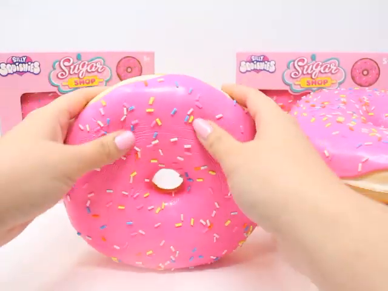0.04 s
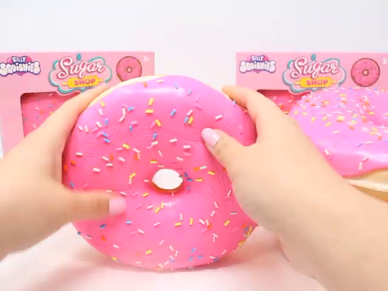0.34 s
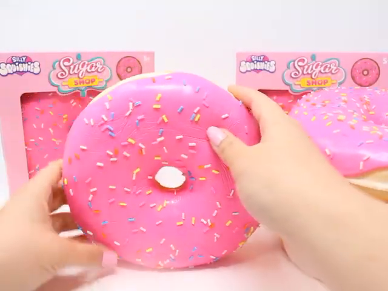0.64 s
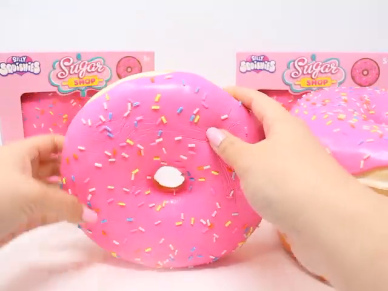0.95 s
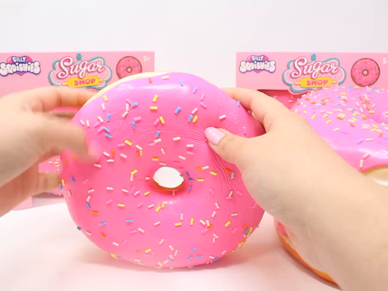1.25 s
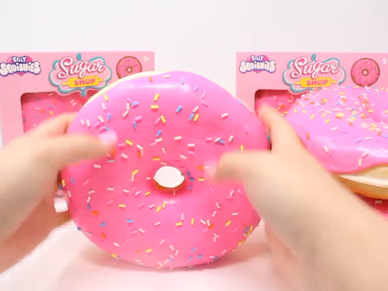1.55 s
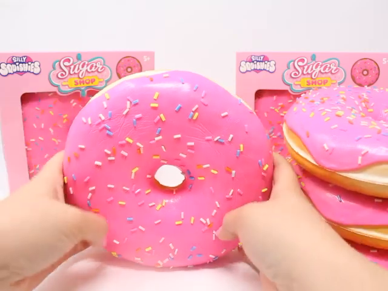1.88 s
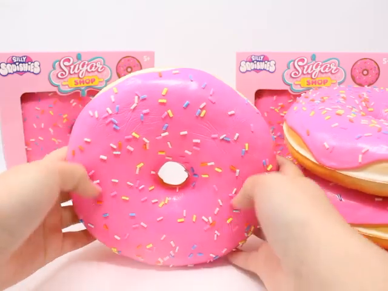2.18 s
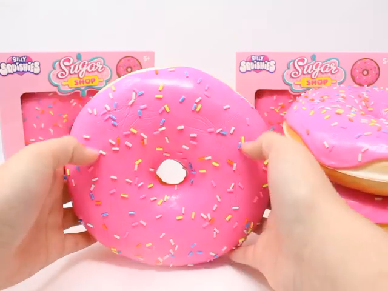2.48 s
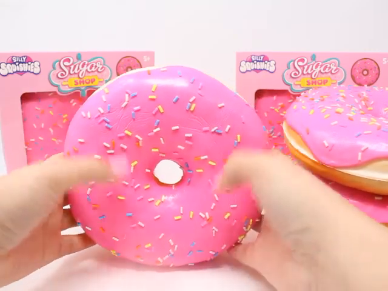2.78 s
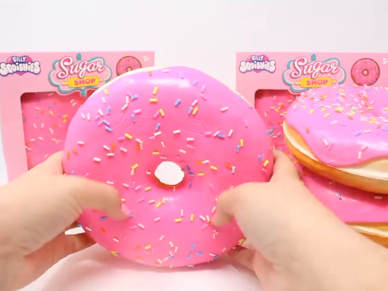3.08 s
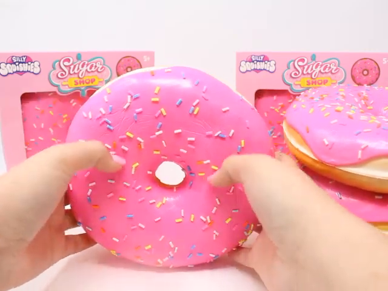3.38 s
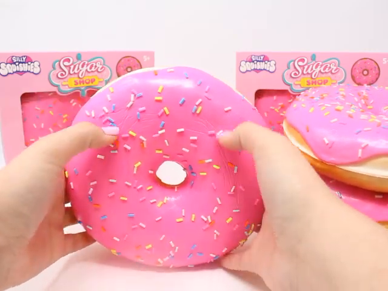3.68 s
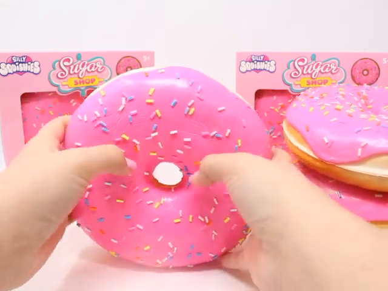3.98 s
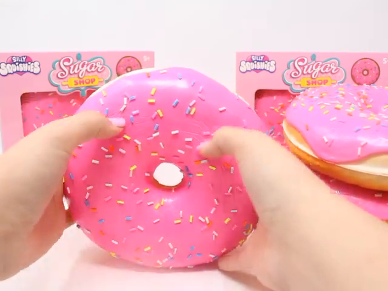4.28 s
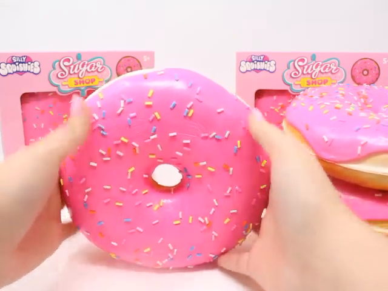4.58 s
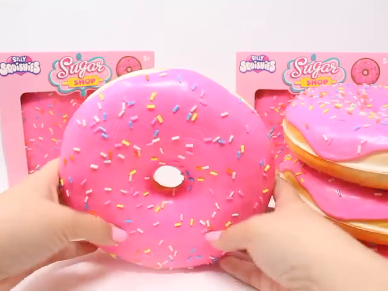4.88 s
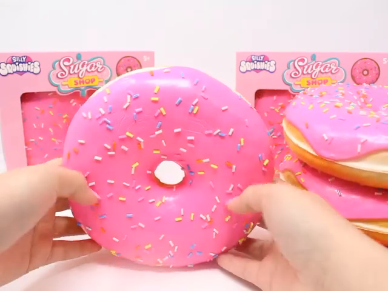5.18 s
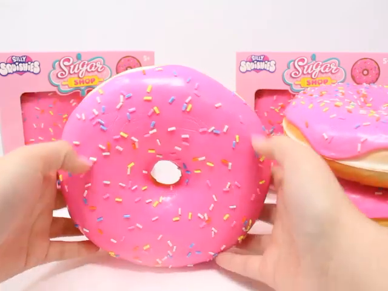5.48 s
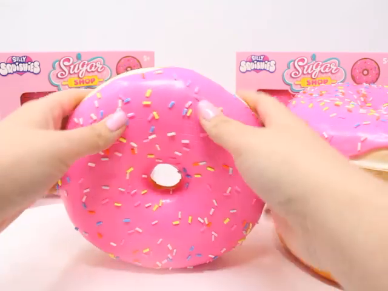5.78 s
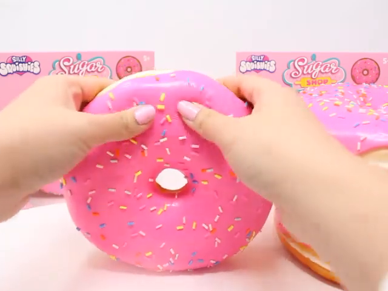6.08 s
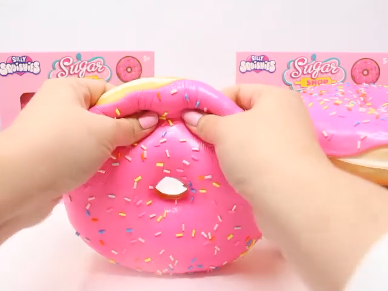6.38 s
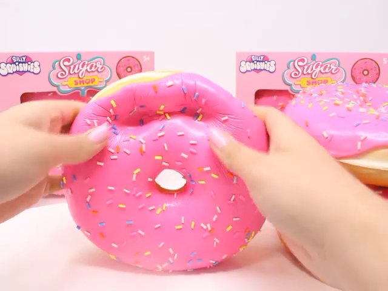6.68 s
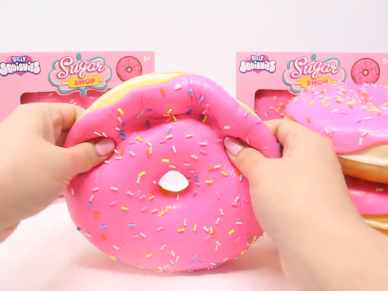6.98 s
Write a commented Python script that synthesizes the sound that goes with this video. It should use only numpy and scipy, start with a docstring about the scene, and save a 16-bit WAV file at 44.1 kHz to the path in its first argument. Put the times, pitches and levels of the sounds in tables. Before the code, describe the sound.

In a small room with a quiet, steady fan hum, a soft foam toy is handled close to the microphone. Gentle rubbing and tiny crackles lead into bunches of sharper sticky pops about once a second as fingers peel away, mixed with occasional fingernail clicks and light taps. The handling ends in softer brushing and crackling. Underneath, a little mechanism ticks faintly and unevenly, and a thin whine briefly comes and goes.

```python
"""Small, sticky pops, very close: fingertips peel off the tacky skin of a big slow-rising foam toy. Two hands
squeeze and turn it on a table. Nails click and knock on the taut skin, palms brush and drag, and now and then
the toy nudges the table with a dull thud. Boxes close behind colour the small room. Underneath, a little
mechanism ticks faintly, a thin whine comes and goes, and a fan hums."""
import sys
import numpy as np
from scipy import signal
from scipy.fft import rfft, irfft
from scipy.io import wavfile
from scipy.ndimage import map_coordinates

SR = 44100
rng = np.random.default_rng(int(sys.argv[2]) if len(sys.argv) > 2 else 0)


def to_wav(sig):
    """Store sig (one row per channel, or 1-D mono) as 16-bit WAV at the path in sys.argv[1].

    Samples outside -1..1 are clipped; the rate is SR.
    """
    pcm = np.clip(np.atleast_2d(sig), -1, 1) * 32767
    pcm = np.round(pcm).astype(np.int16)
    wavfile.write(sys.argv[1], SR, pcm.T)  # frames by channels


N = 310905
TIME = np.arange(N) / SR
SIDE_SIGNS = np.array([[1], [-1]])  # the side signal adds on the left and subtracts on the right

# Table levels are relative; each layer sets its own gain.
# fingertips coming unstuck: start_s, level_db, skin_hz, snap_hz, snap_db, fizz_db, peel_s
PEEL_POPS = [(0.2974, -35.5, 586, 2100, -1, -10, 0.0094), (0.323, -32.5, 580, 2100, -7, -13, 0.0031),
             (0.434, -32.5, 770, 2210, 2.5, -16, 0.0077), (0.497, -33, 800, 1700, -8, -18, 0.0015),
             (0.539, -30.5, 800, 1900, 1.5, -1.5, 0.0063), (0.600, -32, 774, 1400, -5, -30, 0.012),
             (0.625, -28.5, 700, 1510, -5.5, -30, 0.0017), (1.012, -31.5, 746, 2000, -11, -7.5, 0.0022),
             (1.1071, -18.5, 604, 1700, -11, -14.5, 0.0038), (1.1324, -20, 382, 2200, -20, -26, 0.0041),
             (1.2037, -18, 550, 1890, -13.5, -13, 0.0021), (1.2483, -14.5, 400, 2520, -22, -16, 0.0025),
             (1.322, -19, 540, 1630, -4.5, -11, 0.0015), (1.4677, -16.5, 480, 1620, -11.5, -29, .0012),
             (1.643, -25.5, 300, 2020, -21, -35, .0001), (2.088, -12.5, 440, 1290, -7.5, -26.5, 0.0021),
             (2.1582, -14.5, 540, 1200, -16, -25, 0.0023), (2.1816, -14, 597, 2000, -10, -26, 0.011),
             (2.1954, -8, 680, 1250, -15, -23, 0.0022), (2.239, -11, 470, 2930, -22.5, -32, .003),
             (2.3642, -21.5, 410, 2180, -14.5, -19, 0.0048), (2.3846, -6, 524, 2230, -10.5, -36, 0.0018),
             (2.5925, -17.5, 434, 1620, -8, -16, 0.0011), (2.6243, -29.5, 710, 1720, -1.5, -2, 0.002),
             (3.249, -20, 496, 2000, -21, -25, 0.0027), (3.2753, -37, 500, 2200, -8, -5, 0.00085),
             (3.2931, -12.5, 496, 2200, -14, -29, 0.0025), (3.442, -20, 378, 2000, -23, -32, 0.0033),
             (3.4655, -14, 460, 1700, -13, -30, 0.0018), (3.5712, -27, 428, 2900, -14.5, -12, 0.0032),
             (3.5965, -28.5, 700, 1720, 0.5, -5.5, 0.0042), (3.766, -42, 500, 2800, -17, -1.5, .003),
             (3.793, -37, 604, 2780, -6, -7, 0.0049), (3.801, -27, 604, 2850, -9, -14, 0.0071),
             (4.103, -39, 500, 2600, -9, -22, 0.00094), (4.2332, -26, 600, 1900, -3, -12.5, 0.0032),
             (4.2832, -22.5, 715, 1900, -4.5, -13, .0018), (4.2884, -14.5, 455, 1900, -13, -20.5, 0.0023),
             (4.44, -40, 500, 2600, -13, -7, 0.0024), (4.4851, -13.5, 450, 2120, -12, -21.5, .003),
             (5.129, -19.5, 490, 1240, -20, -39, .015), (5.1596, -3, 457, 2380, -18, -29.5, 0.0016),
             (5.2537, -15, 300, 2100, -18, -21.5, 0.0021), (5.3857, -18.5, 540, 1890, -10, -24, 0.018),
             (5.4145, -20.5, 563, 1750, -4.5, -26, 0.0025), (5.4426, -8.5, 440, 2170, -16.5, -32, 0.0017),
             (5.631, -20.5, 407, 2010, -15.5, -19, 0.007), (6.562, -37, 505, 2230, -4, -7, 0.001),
             (6.569, -30, 380, 2190, -15, -7, 0.0087), (6.5924, -30, 423, 2480, -7.5, -6, 0.00094),
             (6.717, -36, 450, 2300, -7, -18, .004), (6.757, -37.5, 500, 2200, -2.5, -20, 0.0019),
             (6.776, -35, 417, 2080, -10, -16, .001), (6.78, -34.5, 417, 1910, -5, -16, 0.0011)]
# nails slipping off the skin: start_s, level_db, bright_hz
NAIL_CLICKS = [(1.321, -13, 1670), (2.2957, -11.5, 3130), (2.297, -13.5, 4000), (2.2997, -8.5, 5270),
               (2.3865, -17, 2280), (2.626, -22, 6560), (4.288, -13, 10800), (4.783, -27, 3200),
               (5.415, -10, 8200), (5.4147, -13, 2240)]
# the ring of a flicked nail: pitch_hz, level_db, t60_s
NAIL_MODES = [(1310, 6, 0.044), (1805, -1.5, 0.034), (2150, 7, 0.017), (2380, -3, 0.02), (2790, 9, 0.026),
              (3100, 1.5, 0.037), (3830, 0, 0.027), (4960, -9, 0.024), (6050, -4.5, 0.03),
              (7600, -1, 0.016), (8780, -2, 0.013), (9300, 3, .015), (13200, -9, .02)]
# nails knocking on the skin: start_s, level_db, cutoff_hz
NAIL_KNOCKS = [(2.1951, -31, 1500), (3.595, -23, 2700), (5.254, -21.5, 3600)]
# the ring of the taut skin: pitch_hz, level_db, t60_s
SKIN_MODES = [(640, -26, 0.015), (834, -2.5, 0.012), (1570, -15, 0.0082), (1790, -12, 0.011),
              (2560, -7, 0.014), (3600, -11, 0.011), (4070, -17, 0.012)]
# a hand sliding to a new grip: peak_s, length_s, hiss_db, rasp_db
HAND_STROKES = [(0.21, 0.077, -68, -62), (0.305, 0.089, -67, -59.5), (0.438, 0.063, -62, -53.5),
                (0.517, 0.1, -63, -59), (0.587, 0.25, -65.5, -71), (1.153, 0.27, -69, -65),
                (1.617, 0.18, -64.5, -77), (1.84, 0.36, -66, -83), (2.178, 0.08, -77, -57),
                (2.39, 0.14, -75, -57), (4.28, 0.049, -68, -53), (4.75, 0.11, -63.5, -74),
                (5.856, 0.37, -63.5, -71), (6.584, 0.04, -63, -56), (6.642, 0.068, -64, -66),
                (6.758, 0.091, -66.5, -58.5)]
# the toy nudging the table: start_s, level_db
TABLE_BUMPS = [(1.129, -54), (1.203, -59), (1.249, -52.5), (2.191, -52), (3.28, -57), (4.786, -46.5),
               (5.159, -56)]
# steps of the little mechanism: start_s, level_db
MECHANISM_STEPS = [(0.052, -57.5), (0.351, -58), (0.716, -60), (0.886, -57.5), (1.018, -55), (1.72, -57.5),
                   (1.783, -58.5), (1.852, -56.5), (2.752, -57), (2.822, -60), (2.921, -58.5), (2.983, -61),
                   (3.053, -56.5), (3.22, -56.5), (3.354, -58), (3.423, -54), (3.52, -55), (3.654, -55),
                   (3.889, -57), (3.955, -57.5), (4.022, -54.5), (4.122, -61), (4.188, -57), (4.556, -61),
                   (4.623, -56.5), (4.922, -55.5), (5.022, -63), (5.088, -58), (5.22, -57), (5.824, -57),
                   (5.934, -58), (6.058, -57), (6.291, -53), (6.357, -56), (6.426, -54.5), (6.526, -56),
                   (7.025, -57.5)]
# the ring of the mechanism: pitch_hz, level_db, t60_s
MECHANISM_MODES = [(1738, -2, 0.022), (2440, -7.5, 0.015), (3350, -17, 0.007)]
# swells of the whine: peak_s, length_s, level_db
WHINE_SWELLS = [(3.997, 0.23, -65), (4.98, 0.1, -67)]
# the fan motor's tones: pitch_hz, level_db
MOTOR_TONES = [(120, -80.5), (207.5, -61), (262, -65.5), (306, -63.5), (551, -62), (1295, -76.5),
               (4548, -86)]
# tone curve of the fan's rushing air: frequency_hz, level_db
RUSH_CURVE = [(25, -36), (45, -10.5), (68, -2), (170, -2.5), (400, -3.5), (750, -4.5), (1100, -11),
              (2200, -18), (5000, -21.5), (10000, -27.5), (16000, -35)]
# resonances of the fan's housing: centre_hz, width_hz, boost_db
HOUSING_PEAKS = [(218, 8.5, 9.5), (256, 34, 5), (317.4, 49, 9.64), (471.5, 24, 7.1), (553.3, 79, 10.46),
                 (642.4, 30, 6.7)]
# stereo width of the rushing air: frequency_hz, side_gain_db
RUSH_WIDTH = [(60, -16), (110, -1), (200, -4.5), (380, -10.5), (700, -7), (1290, 2.5), (2380, 4.5),
              (4400, 3.5), (8120, 2.5), (15000, 2)]
# air ringing in the nook between toy, table and boxes: pitch_hz, level_db, t60_s
NOOK_MODES = [(164, -39.5, 0.026), (250, -55, 0.026), (351.7, -39.5, 0.1), (375, -48, 0.11),
              (482.5, -44, 0.15), (669, -48.5, 0.11), (837, -39, 0.04), (920, -42, 0.073),
              (1202, -42, 0.12), (1328, -33, 0.054), (2520, -50, 0.018)]
# first echoes off table and boxes: delay_s, gain
EARLY_ECHOES = [(.00145, 0.12), (.0025, 0.15), (.0049, 0.12), (.0077, 0.17)]


def peel_pops(gain_db=17, snap_grain_db=-5, hollow_grain_db=-15, grains=14, size=4096):
    """The stretched skin lets go with a hollow suction pulse; its tacky film tears in tiny snaps."""
    out = np.zeros((2, N))
    snap_curve = np.array([(.15, -42), (.8, 3), (1.25, 3), (2.1, -10.5), (3.5, -20), (8, -64)])
    fizz_curve = np.array([(1000, -7), (5000, -2), (9000, -8), (16000, -17.5)])
    for start_s, db, hz, snap_hz, snap_db, fizz_db, peel_s in PEEL_POPS:
        hollow = pulse([(hz / 20, -34), (hz / 4, -10), (hz * 1.21, 0),
                        (hz * 1.44, -1), (hz * 3, -14), (hz * 10, -50)])
        snap = pulse(snap_curve * [snap_hz, 1] + [0, snap_db], fizz_curve + [0, fizz_db])
        strengths, offsets = rng.standard_normal((2, grains))
        lags_s = np.append(0, np.abs(offsets) * peel_s)
        # a quick release is nearly one pulse; a slow peel spreads its energy over many
        slowness = min(peel_s / 0.0034, 1.8)
        pop = np.zeros(size)
        for shape, grain_gain in ((hollow, undb(hollow_grain_db) * slowness ** 2),
                                  (snap, undb(snap_grain_db) * slowness)):
            crackle = np.zeros(size)
            for lag_s, share in zip(lags_s, np.append(1, grain_gain * strengths)):
                add(crackle, lag_s, share * shape)
            pop -= crackle * np.linalg.norm(shape) / np.linalg.norm(crackle)
        add(out, start_s, undb(db + gain_db) * small_room(pop))
    return out


def nail_knocks(low_cut_hz=450):
    """A nail knocks on the taut skin for a short, hollow ring; harder contact reaches higher modes."""
    out = np.zeros((2, N))
    for start_s, db, cutoff_hz in NAIL_KNOCKS:
        rap = -sum(undb(mode_db) / np.hypot(1, (hz / cutoff_hz) ** 4) * ring(hz, t60, -np.pi / 2)
                   for hz, mode_db, t60 in SKIN_MODES)
        rap = low_cut(low_cut(rap, low_cut_hz), low_cut_hz)  # the foam is too soft to carry bass
        add(out, start_s, undb(db) * small_room(rap))
    return out


def nail_clicks(gain_db=-23, reach_octaves=0.19, crack_db=-1, crack_t60=0.0091):
    """A nail slips off with a dry crack and rings; the point of contact picks the strongest modes."""
    out = np.zeros((2, N))
    crack_curve = np.array([(0.6, -38), (0.79, 0), (1.14, -2), (1.46, -15), (3, -26)])
    for start_s, db, bright_hz in NAIL_CLICKS:
        ping = 0
        for hz, mode_db, t60 in NAIL_MODES:
            excitation = np.exp(-(np.log2(hz / bright_hz) / reach_octaves) ** 2)
            ping += undb(mode_db) * excitation * ring(hz, t60, np.pi / 2)
        ping = low_cut(ping, bright_hz / 2)
        noise = unit_rms(eq(rng.standard_normal(len(ping)), crack_curve * [bright_hz, 1]))
        crack = undb(crack_db) * noise * decay(crack_t60)
        add(out, start_s, undb(gain_db + db) * small_room(ping + crack))
    return out


def friction_envelope(stroke_levels_db, drag_db, resting_db, rise_s=0.029, fall_s=0.039):
    """Friction swells with each stroke and around each pop; the hands never rest completely."""
    power = undb(resting_db) ** 2
    for (peak_s, length_s, *_), db in zip(HAND_STROKES, stroke_levels_db):
        power += undb(db) ** 2 * np.exp(-(2 * (TIME - peak_s) / length_s) ** 2)
    for pop_s, pop_db, *_ in PEEL_POPS:
        distance = np.maximum((pop_s - TIME) / rise_s, (TIME - pop_s) / fall_s)
        drag = undb(drag_db + 0.4 * pop_db)  # a stronger pop drags harder
        power += drag ** 2 * np.exp(-2 * np.minimum(distance, 20))
    return np.sqrt(power)


def palm_rubbing(hiss_db=3.5, rasp_db=-1, hiss_flutter_db=1, rasp_flutter_db=3.5, width=0.66):
    """Countless tiny slips: a fine hiss from the palms, a coarser rasp where the skin drags."""
    _, _, hiss_levels, rasp_levels = np.transpose(HAND_STROKES)
    hiss_swell = friction_envelope(hiss_levels, drag_db=-65, resting_db=-72)
    rasp_swell = friction_envelope(rasp_levels, drag_db=-51, resting_db=-74)
    hiss_swell *= undb(hiss_db + hiss_flutter_db * wander(45))
    rasp_swell *= undb(rasp_db + rasp_flutter_db * wander(45))
    slips = rng.standard_normal((4, N))
    hiss = eq(slips[:2], [(500, 0.5), (2000, -3), (4200, 2.5), (7000, -1), (11000, -6), (16000, -13.5)])
    rasp = eq(slips[2:], [(150, -4), (700, 7.5), (1500, 0.5), (2500, -2.5), (4000, -13), (9000, -51)])
    mid, side = hiss_swell * unit_rms(hiss) + rasp_swell * unit_rms(rasp)
    return mid + SIDE_SIGNS * width * side


def skin_snags(gain_db=-5, catches_per_s=150, spread_db=4.5):
    """Dragged skin catches and slips again and again: a string of tiny dry snaps."""
    catches = rng.random(N) < catches_per_s / SR
    strengths = undb(spread_db * np.minimum(rng.standard_exponential(N), 3))
    snap = pulse([(200, -30), (900, -6), (1700, -0.5), (2400, 1), (3800, 0), (6500, -13.5), (14000, -24)])
    crackle = unit_rms(signal.fftconvolve(catches * strengths, snap)[:N])
    rasp_levels = [rasp_db for *_, rasp_db in HAND_STROKES]
    swell = friction_envelope(rasp_levels, drag_db=-60.5, resting_db=-83)
    return small_room(undb(gain_db) * swell * crackle)[:, :N]


def table_bumps(gain_db=9, t60=0.098, attack_s=0.0067):
    """The soft toy leans into the table top with a dull thud."""
    out = np.zeros((2, N))
    thud = soften(ring(88, t60, np.pi / 2) + ring(127, t60, np.pi / 2), attack_s)
    for start_s, db in TABLE_BUMPS:
        add(out, start_s, undb(db + gain_db) * thud)
    return out


def mechanism_ticks(gain_db=12, attack_s=0.0014, rattle_db=-10, rattle_t60=0.019):
    """Each step of the little mechanism gives a soft, edgy ping with a trace of rattle."""
    out = np.zeros(N)
    rattle_curve = [(800, 3), (1700, -1), (2500, 2), (4000, -6), (10000, -30)]
    for start_s, db in MECHANISM_STEPS:
        tuning = 1 + 0.012 * rng.standard_normal()
        ping = sum(undb(mode_db) * ring(hz * tuning, t60) for hz, mode_db, t60 in MECHANISM_MODES)
        noise = unit_rms(eq(rng.standard_normal(len(ping)), rattle_curve))
        rattle = undb(rattle_db) * noise * decay(rattle_t60)
        add(out, start_s, undb(db + gain_db) * soften(ping + rattle, attack_s))
    return small_room(out, scatter_db=-8, tail_db=-22)[:, :N]


def faint_whine(pitch_hz=1295, drift_hz=7):
    """A thin, unsteady tone swells and fades."""
    swell = sum(undb(db) * np.exp(-(2 * (TIME - peak_s) / length_s) ** 4)
                for peak_s, length_s, db in WHINE_SWELLS)
    return swell * sine(pitch_hz + drift_hz * wander(11))


def fan(rush_db=-51.5, waver_db=2, drift_hz=1.253):
    """Air rushes through a resonant housing; the motor's tones waver over it."""
    bins_hz = np.fft.rfftfreq(N, 1 / SR)
    housing = 1 + sum((undb(db) - 1) / (1 + (2 * (bins_hz - centre_hz) / width_hz) ** 4)
                      for centre_hz, width_hz, db in HOUSING_PEAKS)
    air = irfft(rfft(rng.standard_normal((2, N))) * housing, N)
    mid, side = unit_rms(eq(air, RUSH_CURVE))
    rush = mid + SIDE_SIGNS * eq(side, RUSH_WIDTH)
    hum = sum(undb(db + waver_db * wander(4.157)) * sine(hz + drift_hz * wander(6))
              for hz, db in MOTOR_TONES)
    return undb(rush_db) * rush + np.sqrt(2) * hum


def small_room(sound, scatter_db=-4, scatter_t60=0.054, tail_db=-12, tail_t60=0.35, size=8192):
    """Direct sound, the ringing nook and first echoes, then a diffuse scatter and the room's tail."""
    response = sum(undb(db) * ring(hz, t60) for hz, db, t60 in NOOK_MODES)
    response[0] += 1  # direct sound
    for delay_s, gain in EARLY_ECHOES:
        add(response, delay_s, gain * pulse([(1500, 8), (5000, -5.5), (14000, -16)]))
    scatter_curve = [(100, -8), (300, -45), (1000, 8), (2500, 7), (6000, 9), (16000, 7.5)]
    tail_curve = [(200, -1), (1000, 11.5), (3000, 6), (7000, 9.5), (16000, -5)]
    for db, t60, curve in ((scatter_db, scatter_t60, scatter_curve), (tail_db, tail_t60, tail_curve)):
        mid, side = rng.standard_normal((2, size))  # fresh on each call, as the hands move
        side = eq(side, [(400, -11), (1500, -6.5), (4000, -2.5)])  # long waves reach both sides alike
        diffuse = eq(mid + SIDE_SIGNS * side, curve) / np.sqrt(2)
        response = response + undb(db) * diffuse * decay(t60) / np.linalg.norm(decay(t60))
    return signal.fftconvolve(sound[None], response, axes=1)


def undb(db):
    """Decibels to gain."""
    return 10 ** (np.asarray(db) / 20)


def unit_rms(sound):
    """Scale to rms 1."""
    return sound / np.sqrt(np.mean(sound ** 2))


def curve_gain(curve, size):
    """Gain per FFT bin, joining (frequency_hz, level_db) points on a log-frequency axis."""
    hz, db = np.transpose(curve)
    bins_hz = np.fft.rfftfreq(size, 1 / SR)
    return undb(np.interp(np.log(bins_hz + 1), np.log(hz), db))


def eq(sound, curve):
    """Shape a sound with a tone curve."""
    size = sound.shape[-1]
    return irfft(rfft(sound) * curve_gain(curve, size), size)


def low_cut(sound, hz):
    """Roll off the bass."""
    return signal.sosfilt(signal.butter(2, hz, "high", fs=SR, output="sos"), sound)


def pulse(*curves, size=1024):
    """The tightest causal click whose power spectrum is the sum of these tone curves."""
    power = sum(curve_gain(curve, size) ** 2 for curve in curves)
    cepstrum = irfft(np.log(power) / 2)
    cepstrum[1:size // 2] *= 2  # fold to minimum phase
    cepstrum[size // 2 + 1:] = 0
    return irfft(np.exp(rfft(cepstrum)))


def decay(t60, size=8192):
    """An envelope that falls 60 dB in t60 seconds."""
    return undb(-60 * TIME[:size] / t60)


def soften(sound, attack_s):
    """Round off the attack."""
    return sound * (1 - np.exp(-TIME[:len(sound)] / attack_s))


def ring(hz, t60, phase=0, size=8192):
    """One damped mode."""
    return np.cos(2 * np.pi * hz * TIME[:size] + phase) * decay(t60, size)


def sine(hz):
    """A pure tone that follows a moving pitch."""
    return np.sin(2 * np.pi * np.cumsum(hz) / SR)


def wander(rate_hz):
    """Smooth random modulation with a spread near 1."""
    knots = rng.standard_normal(int(TIME[-1] * rate_hz) + 4)
    return map_coordinates(knots, [TIME * rate_hz], order=3, mode="nearest")


def add(track, start_s, sound):
    """Mix a sound in at its cue."""
    start = int(start_s * SR)
    part = sound[..., :N - start]
    track[..., start:start + part.shape[-1]] += part


def scene():
    """The handled toy up front; ticks, whine and fan behind it."""
    toy = peel_pops() + nail_knocks() + nail_clicks() + palm_rubbing() + skin_snags() + table_bumps()
    return toy + mechanism_ticks() + faint_whine() + fan()


def record(dry, balance_db=-0.74, high_cut_hz=16000):
    """The image leans slightly right, and the very top is cut."""
    panned = dry * undb(SIDE_SIGNS * balance_db / 2)
    return signal.sosfilt(signal.ellip(10, .1, 70, high_cut_hz, fs=SR, output="sos"), panned)


dry = scene()
out = record(dry)
to_wav(out)
```